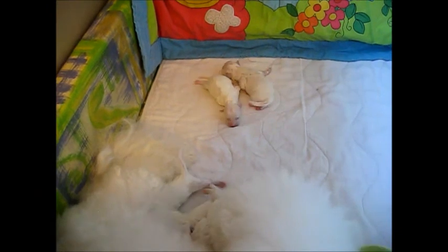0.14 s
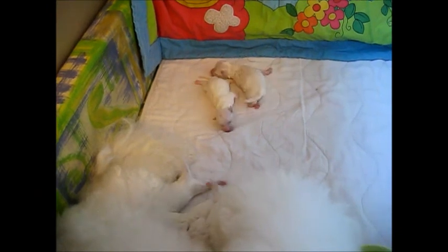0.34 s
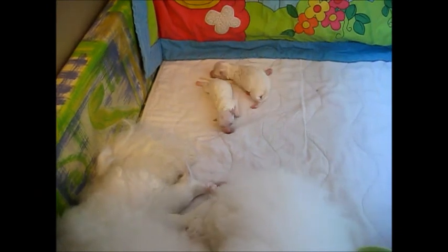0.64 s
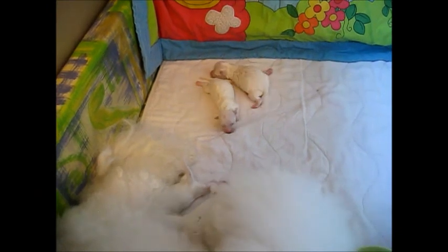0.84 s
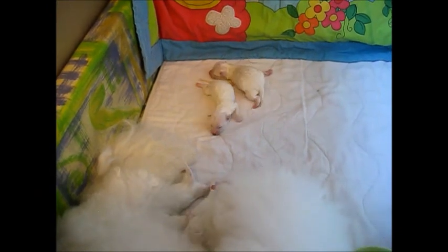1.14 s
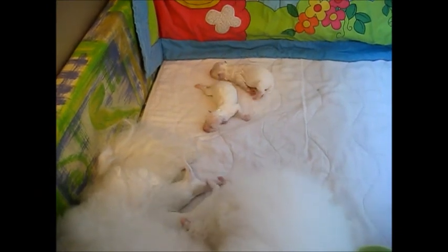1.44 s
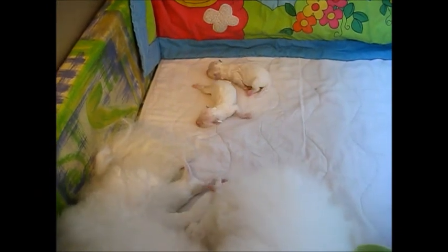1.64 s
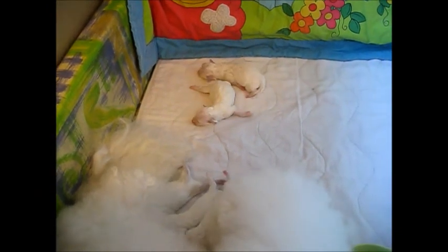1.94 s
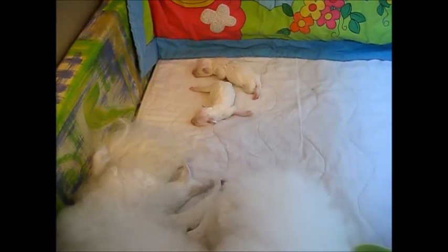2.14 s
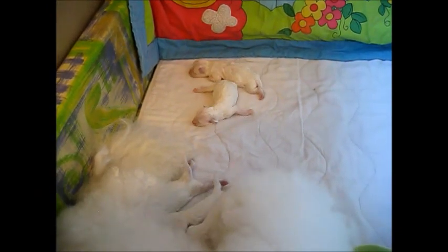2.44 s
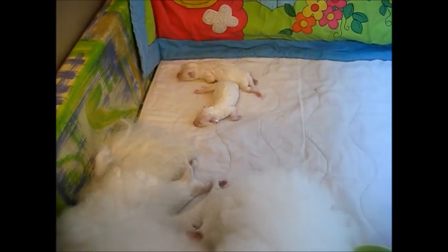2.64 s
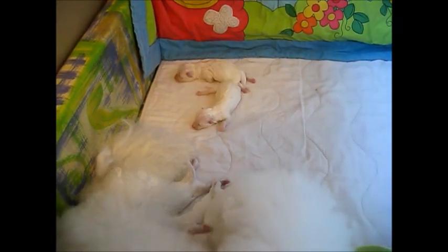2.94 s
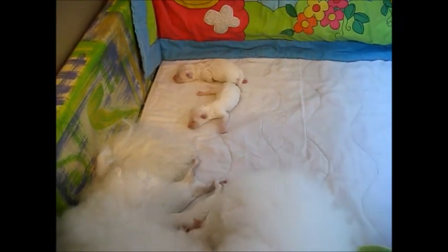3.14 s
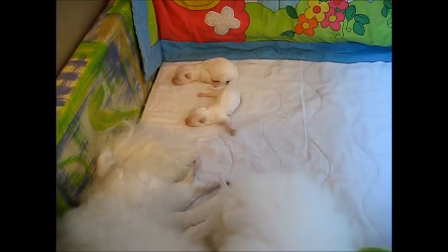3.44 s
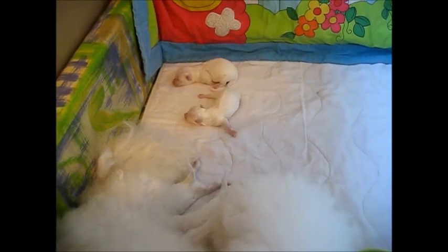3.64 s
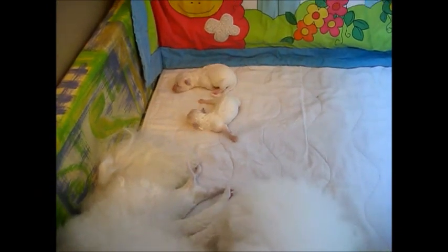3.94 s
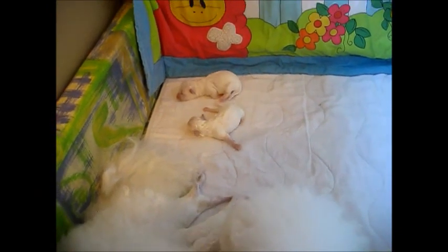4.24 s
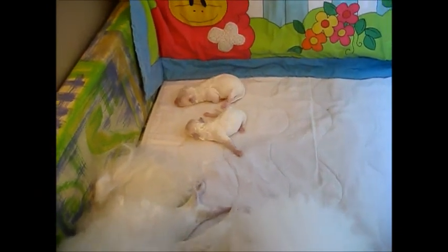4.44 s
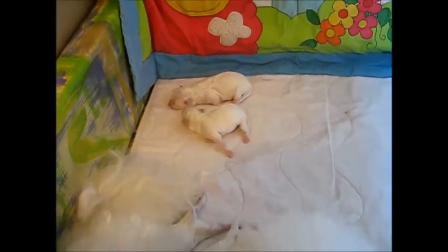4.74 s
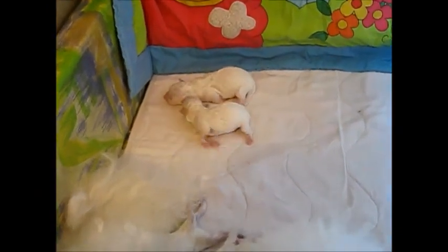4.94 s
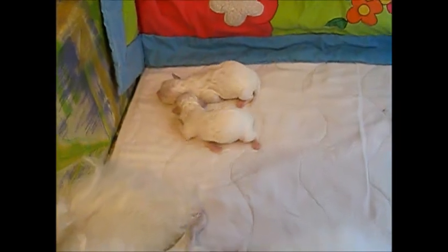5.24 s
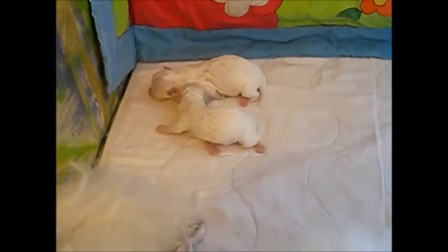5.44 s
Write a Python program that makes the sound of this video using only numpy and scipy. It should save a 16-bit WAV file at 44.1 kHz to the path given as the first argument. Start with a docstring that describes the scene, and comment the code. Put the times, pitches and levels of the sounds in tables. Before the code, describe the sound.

Newborn puppies in a padded box give short, thin, gliding squeaks from the very start. Faint taps of paws pass underneath. Around halfway rough, low groans join the cries, then a tight cluster of hard knocks follows just after four seconds, one very loud and bright. Whimpers continue to the end. The room is small and fairly dry, with a close, hissy small microphone and barely audible hum.

```python
"""Newborn puppies squeak and groan in a padded box indoors, close to a small microphone.
Shaped noise hisses over a faint low hum from the start, its treble swelling and easing throughout.
Thin cries, three partials on one gliding pitch, begin at once and last to the end.
Paws and claws soon tick now and then: wall modes, a puff of noise and a bright crack.
Low groans join halfway, pulses and breath noise through throat resonances; the hardest knocks follow."""
import sys
import numpy as np
from scipy import signal
from scipy.io import wavfile
from scipy.ndimage import uniform_filter1d

SR = 44100
rng = np.random.default_rng(int(sys.argv[2]) if len(sys.argv) > 2 else 0)


def attenuation_scalar(level_db):
    """Turn a level in dB into a linear amplitude multiplier (20 dB per decade)."""
    decades = np.asarray(level_db, float) / 20
    return 10 ** decades


def materialize(psi):
    """Save the field psi as 16-bit PCM at rate SR to the path in sys.argv[1].

    A 1-D psi becomes a single channel; in a 2-D psi each row is a channel.
    """
    bounded = np.clip(np.atleast_2d(psi).T, -1, 1)
    quanta = np.round(bounded * 32767).astype(np.int16)
    wavfile.write(sys.argv[1], SR, quanta)


N = 246519


def evened(x):
    """Scales to rms 1."""
    return x / np.sqrt(np.mean(x ** 2) + 1e-20)


def add(mix, start_s, sound):
    """Mixes a sound in at its start time."""
    part = mix[round(start_s * SR):][:len(sound)]
    part += sound[:len(part)]


def resonate(x, hz, width_hz):
    """One resonance of gain 1 at its peak."""
    return signal.lfilter(*signal.iirpeak(hz, hz / width_hz, SR), x)


def wobble(count, samples):
    """Slow random drift of rms 1: noise averaged twice over a span of samples."""
    smooth = uniform_filter1d(rng.standard_normal(count), int(samples))
    return evened(uniform_filter1d(smooth, int(samples)))


# Colour of the hiss. Each row: frequency in Hz, relative density in dB per Hz.
HISS_COLOUR = [(12, -40), (20, -1), (101, -11), (181, -9), (508, -6.5), (1310, -7), (1470, -4.5),
               (1730, -6), (2360, -4), (4870, -3), (7190, -6.5), (7820, -9), (8990, -5), (11200, -0.5),
               (15700, -15)]
# Swell of the hiss. Each row: time in seconds, treble level in dB (heard relative to the median row).
HISS_SWELL = [(0, -50.5), (.07, -51.5), (.1, -45), (0.329, -44.5), (.42, -39), (.9, -37), (1.1, -39.5),
              (1.3, -35.5), (1.45, -36), (1.52, -38.5), (2.34, -39), (2.38, -37), (3.7, -36), (3.85, -37),
              (5.38, -37.5), (5.45, -36)]


def hiss():
    """Room and microphone noise; the higher the band, the more it follows the swell."""
    level_db, hop, size = -35.5, 256, 1024
    frames, hz = N // hop + 5, np.fft.rfftfreq(size, 1 / SR)
    real, imaginary, patches = rng.standard_normal((frames, len(hz), 3)).T
    # slight unevenness, smoothed over time and frequency
    patches = uniform_filter1d(patches, 14, 0)
    patches = evened(uniform_filter1d(patches, 10, 1))

    s, treble_db = np.transpose(HISS_SWELL)
    t = np.arange(frames) * hop / SR
    swell_db = np.interp(t, s, treble_db - np.median(treble_db))
    share = np.clip(np.log(hz / 900 + 1e-9) / 1.78, 0, 1.2)  # none below 900 Hz

    colour_hz, colour_db = np.transpose(HISS_COLOUR)
    colour_db = np.interp(np.log(hz + 1), np.log(colour_hz), colour_db)
    gain_db = colour_db[:, None] + share[:, None] * swell_db + 0.8 * patches
    spectrum = (real + 1j * imaginary) * attenuation_scalar(gain_db)
    noise = signal.istft(spectrum, nperseg=size, noverlap=size - hop)[1][:N]
    return attenuation_scalar(level_db) * evened(noise)


# The hum, a single row: centre in Hz, width in Hz, level in dB.
HUM_BAND = (103, 19, -61)


def hum():
    """A low, fuzzy hum: noise through one narrow resonance."""
    hz, width_hz, level_db = HUM_BAND
    return attenuation_scalar(level_db) * evened(resonate(rng.standard_normal(N), hz, width_hz))


# The cries, one table per stretch of voice, parted at a pitch jump, a pause or a dip in level.
# Each row: time in seconds, pitch in Hz, effort in dB, lift of the overtones in dB.
CRY_GLIDES = [
    [(0.085, 1767, -48, 1), (0.129, 1897, -43.5, -5), (0.169, 1792.0, -38.5, -1.5),
     (0.193, 1580.0, -28.0, 0), (0.217, 1592, -28.5, -3), (0.243, 1900, -59.5, 16)],
    [(0.35, 1960, -49.5, 2), (0.472, 1927, -49, 9.0)],
    [(0.678, 1667, -41, -7), (0.702, 1624, -31.5, -5), (0.712, 1315, -54, 10.0), (0.73, 1190, -46, 4.0)],
    [(0.97, 808, -40.5, -5), (1.03, 1159, -35.5, 9), (1.054, 1260, -45.5, 10), (1.076, 1335, -37, 13),
     (1.102, 1387.0, -35, 14), (1.132, 1265, -39.5, 7.5), (1.15, 1156, -31, 11), (1.17, 1123.0, -31.5, 3),
     (1.191, 1147, -35, 13.5), (1.201, 1270.0, -37, 0)],
    [(1.201, 1265, -39, 14), (1.233, 1475, -35.5, -21), (1.253, 1521, -28, 1.5), (1.301, 1600, -25, 2),
     (1.325, 1524, -28.5, -6.5), (1.36, 1346, -46, 14.5), (1.415, 1375.0, -46, 3), (1.447, 1405, -44.5, 1),
     (1.529, 970, -45.5, -1.5)],
    [(1.905, 1660, -42, -7), (1.921, 1707, -43, 2.5), (1.954, 1627, -37, -5), (1.963, 1327, -48, 10),
     (2.003, 1116, -41.0, 7.0), (2.035, 1150, -47.5, 6), (2.061, 1330, -52.0, 7.5)],
    [(2.064, 1490, -51, 1.5), (2.072, 1600, -37, -1), (2.09, 1620.0, -59.0, 9)],
    [(2.255, 1387, -42, -1), (2.299, 1372, -31.5, -10), (2.331, 1317, -43, 2.5), (2.353, 1230, -39.5, -0.5),
     (2.429, 1320, -57, 12)],
    [(2.995, 1216, -51, 15.5), (3.051, 1327, -30, -3), (3.091, 1230, -42.5, 9.5),
     (3.115, 1179.0, -36.5, -0.5), (3.169, 998, -35, 0.5), (3.185, 1060.0, -37, 0)],
    [(3.378, 792, -40, -5), (3.41, 932, -44.0, 5.5), (3.45, 1117.0, -40.0, -1), (3.48, 1436, -39, 3),
     (3.502, 1540, -46.0, 16), (3.534, 1433, -36, 4.0), (3.578, 1158, -40, -0.5), (3.593, 1074, -36, 1),
     (3.629, 1080, -37, 2.0), (3.667, 1190, -41, -0.5), (3.719, 1003.0, -37, 5.0), (3.763, 823, -40.5, 0)],
    [(3.86, 1135, -39.0, -4), (3.91, 1290, -33, 1.0), (3.94, 1256, -30.5, 0), (3.96, 1185, -31.5, -8),
     (4.01, 1046, -28.5, -3.5), (4.05, 964, -31, 1), (4.064, 970.0, -31.5, 0.5), (4.099, 1075, -39, 1)],
    [(4.09, 1264.0, -34, -3.5), (4.102, 1260, -36.5, -3), (4.124, 1390, -42, 9)],
    [(4.125, 1020, -38.5, 2), (4.169, 1082, -40, 3), (4.189, 1138, -39, -2), (4.215, 1326, -37, 2.5),
     (4.235, 1410.0, -36.5, 4.5), (4.269, 1600, -43.5, 12.5)],
    [(4.27, 1720, -36, 6.5), (4.28, 1770, -42, 6), (4.292, 1780, -61.5, 18.5)],
    [(4.333, 1870, -45, 1), (4.347, 1794.0, -49, 8), (4.383, 1760.0, -43.0, 9), (4.455, 1754.0, -49.5, 12)],
    [(4.615, 1184, -37.5, -6), (4.655, 1272, -30, -4), (4.681, 1320.0, -26.5, -6.5),
     (4.749, 1212.0, -29, -2), (4.765, 1190.0, -33, -2), (4.801, 1076.0, -31.0, 2.5),
     (4.819, 1067, -34.5, 3.5), (4.83, 1170, -35, 4)],
    [(4.83, 1330, -36, 4), (4.854, 1341.0, -47, -4), (4.89, 1160.0, -57, 1)],
    [(4.915, 1650, -54, 15), (4.965, 1758.0, -48, 12)],
    [(5.165, 1915, -41.5, 2), (5.199, 1896, -44.5, -2), (5.225, 1680, -45, 6.0)],
    [(5.42, 1226, -48, -1), (5.432, 1231, -34, 3), (5.458, 1234, -29, -7), (5.482, 1170, -27.5, 0.5),
     (5.53, 1100, -24.5, -1), (5.556, 1068, -30.5, -0.5), (5.588, 875, -32.0, -6)],
]
# Extra lift of the third partial. One value for each stretch of voice, in dB.
CRY_THIRDS = [0.1, -3, -3, 0.5, -1, 2, -3, 7, 5, 4, -7, -3, 0.1, -3, -3, -3, -1, -3, -3, -5]
# Partials at the vocal folds, lowest first. Each row: level in dB, share of the overtone lift (a factor).
FOLD_PARTIALS = [(0, 0), (-5, 1.04), (-12.5, 0.94)]
# What mouth and box pass of a partial. Each row: frequency in Hz, gain in dB.
MOUTH_GAIN = [(800.0, -7), (1050.0, -4), (1200.0, 3), (1300.0, 0.5), (1450.0, 5), (1600.0, 0.5),
              (1800.0, 5.5), (2000.0, 6), (2150.0, 7.5), (2300.0, 3), (2450.0, 0.5), (2600.0, 4),
              (2800.0, -2.5), (3000.0, 4.5), (3200.0, -3.5), (3600.0, 1), (4200.0, -7.0), (5000.0, -17)]


def cry(rows, third_db):
    """Near-sine voice: three partials on one gliding pitch pass the mouth, with slight shiver."""
    shiver_db, edge_s = 1.0, 0.0034
    s, hz, effort_db, lift_db = np.transpose(rows)
    t = np.arange(s[0], s[-1], 1 / SR)
    glide = uniform_filter1d(np.interp(t, s, hz), 500, mode="nearest")
    pitch = glide * (1 + 0.0053 * wobble(len(t), 63))
    phase = 2 * np.pi * np.cumsum(pitch) / SR
    lift_db = np.interp(t, s, lift_db)
    mouth_hz, mouth_db = np.transpose(MOUTH_GAIN)
    voice = np.zeros(len(t))
    for k, (fold_db, share) in enumerate(FOLD_PARTIALS, 1):
        level_db = fold_db + (k == 3) * third_db + share * lift_db
        level_db = level_db + np.interp(k * pitch, mouth_hz, mouth_db)
        level_db = level_db + shiver_db * wobble(len(t), 180)
        voice += attenuation_scalar(level_db) * np.sin(k * phase)
    edges = np.clip(np.minimum(t - s[0], s[-1] - t) / edge_s, 0, 1)
    effort = np.sqrt(2) * attenuation_scalar(np.interp(t, s, effort_db))
    return s[0], effort * voice * edges


# Paws and claws on the box.
# Each row: start in seconds, level in dB, centre of the blow in Hz, crack relative to the ring in dB.
PAW_KNOCKS = [(.226, -37, 2500, 6), (0.419, -42, 260, -30), (1.353, -30, 950, -34),
              (3.828, -13.5, 1500, -25), (3.903, -13.5, 1080, -25), (4.1408, -26, 1000, 2),
              (4.1423, -15, 1500, 4.5), (4.2028, -0.5, 4500, -2), (4.2245, -20, 1870, -25),
              (5.123, -36, 480, -23)]
# Modes of the box walls. Each row: frequency in Hz, level in dB, time to fall by 60 dB in seconds.
WALL_MODES = [(240, -19, 0.055), (493, -16, 0.058), (730, -10, 0.051), (1000, -2, 0.015),
              (1500, -4.5, .014), (2340, 1, .012), (3120, -6, 0.0095), (4500, 6, 0.0057)]


def knock(start_s, level_db, centre_hz, crack_db):
    """Wall modes near the centre of the blow ring in a dry puff of noise, with a bright crack on top."""
    blow_octaves, crack_t60_s, rise_s = 0.77, 0.0049, 0.0003
    t = np.arange(3000) / SR
    hz, mode_db, t60_s = np.transpose(WALL_MODES)[:, :, None]
    share = attenuation_scalar(mode_db) * np.exp(-(np.log2(hz / centre_hz) / blow_octaves) ** 2)
    fading = share / np.linalg.norm(share) * attenuation_scalar(-60 * t / np.maximum(t60_s, .003))
    ring = (fading * np.sin(2 * np.pi * hz * t)).sum(0)

    puff, click = rng.standard_normal((2, len(t)))
    puff = evened(resonate(puff, centre_hz, 0.38 * centre_hz))
    puff = puff * np.linalg.norm(fading, axis=0)  # dies away with the ring
    bright = resonate(resonate(click, 11300, 3800), 10900, 3200)
    crack = evened(bright + 0.48 * resonate(click, 6500, 2200))
    crack = crack * attenuation_scalar(crack_db - 60 * t / crack_t60_s)
    rise = 1 - np.exp(-t / rise_s)
    return start_s, attenuation_scalar(level_db) * rise * (ring + .35 * puff + crack)


# The low groans, one table each. Each row: time in seconds, pitch in Hz, effort in dB,
# roughness from 0 to 1, mouth opening from 0 (shut) to 2 (wide).
GROAN_GLIDES = [
    [(2.91, 626, -38, 0.93, .8), (2.93, 616, -41, 0.78, 0.82), (2.955, 708, -36, 0.47, 0.63),
     (3.03, 616, -43.5, 0.84, 0.7)],
    [(3.27, 540, -46, .4, 1.0), (3.295, 497, -38, .22, 1.4), (3.335, 470, -38, .3, 1.1),
     (3.342, 570, -38.5, .35, .9), (3.378, 630, -41, .45, .9)],
    [(3.45, 593, -48, 1, 0.24), (3.5, 706, -37, 0.57, 0.12), (3.57, 640, -44, 0.84, 0.79)],
    [(3.97, 590, -42, 0.83, 1.6), (4.02, 613, -34.5, 1, 1.56), (4.09, 584, -48, .95, 1.6)],
    [(5.42, 571, -23.5, 0.25, 0.46), (5.435, 571.6, -29, 0.59, 1), (5.46, 512, -32.5, 0.98, 1.0),
     (5.5, 483, -34.5, 0.58, 1), (5.59, 450, -40.5, 0.65, 0.66)],
]
# Throat resonances. Each row: frequency in Hz, width of each of two passes in Hz, level in dB.
THROAT_RESONANCES = [(570, 480, 6), (1250, 410, 10), (1990, 750, 8), (3100, 1140, 3.5)]


def groan(rows):
    """Uneven pulses and puffs of breath through the throat; an open mouth lets the upper resonances out."""
    s, *columns = np.transpose(rows)
    t = np.arange(s[0], s[-1], 1 / SR)
    hz, effort_db, rough, mouth = (np.interp(t, s, column) for column in columns)
    rough = np.clip(rough, 0, 1)
    turns = np.cumsum(hz * (1 + 0.16 * rough * wobble(len(t), 40))) / SR
    folds = sum(np.cos(2 * np.pi * k * turns) for k in range(1, 10))
    puffs = (0.29 + np.exp(-(turns % 1) / 0.88)) * rng.standard_normal(len(t))
    lumps = attenuation_scalar(3.5 * rough * wobble(len(t), 100))  # a rough voice catches and lets go
    drive = lumps * ((1 - rough) * evened(folds) + 1.5 * rough * evened(puffs))

    shut_db = -8 * (1 - mouth)  # change per step up the resonances
    throat = np.zeros(len(t))
    for k, (f, width_hz, level_db) in enumerate(THROAT_RESONANCES):
        tone = resonate(resonate(drive, f, width_hz), f, width_hz)
        throat += (-1) ** k * attenuation_scalar(level_db + k * shut_db) * tone
    return s[0], attenuation_scalar(effort_db) * evened(throat) * signal.windows.tukey(len(t), .1)


def box(x):
    """A faint, short room tail of fading noise behind the direct sound."""
    tail_db, t60_s, gap_s = -20, 0.4, .004
    t = np.arange(SR // 4) / SR
    tail = rng.standard_normal(len(t)) * attenuation_scalar(-60 * t / t60_s) * (t > gap_s)
    taps = attenuation_scalar(tail_db) * tail / np.linalg.norm(tail)
    taps[0] = 1  # direct sound
    return signal.oaconvolve(x, taps)[:N]


def scene():
    """Voices and knocks in the box, over hiss and hum, in one channel heard on both sides."""
    near = np.zeros(N)
    for rows, third_db in zip(CRY_GLIDES, CRY_THIRDS):
        add(near, *cry(rows, third_db))
    for row in PAW_KNOCKS:
        add(near, *knock(*row))
    for rows in GROAN_GLIDES:
        add(near, *groan(rows))
    return np.tile(box(near) + hiss() + hum(), (2, 1))


def top_cut(x):
    """Nothing passes above the cut-off."""
    return signal.sosfilt(signal.butter(12, 15980, fs=SR, output="sos"), x)


def record(dry):
    """A deep notch in the treble, then a steep upper band limit."""
    notch_hz, notch_q, edge_hz = 7881, 6.5, 15720
    notched = signal.lfilter(*signal.iirnotch(notch_hz, notch_q, SR), dry)
    edge = signal.firwin(2047, edge_hz, window=("kaiser", 10), fs=SR)
    mix = signal.oaconvolve(notched, edge[None], "same")
    return top_cut(mix)


dry = scene()
out = record(dry)
materialize(out)
```